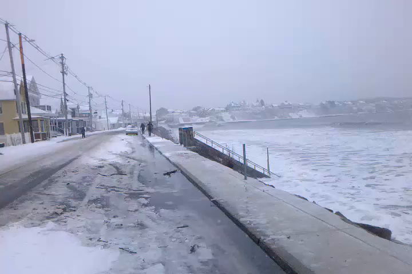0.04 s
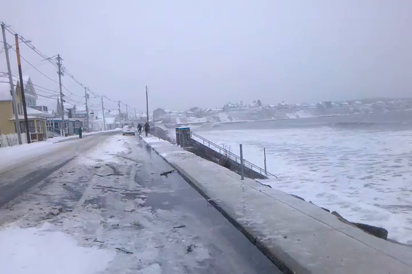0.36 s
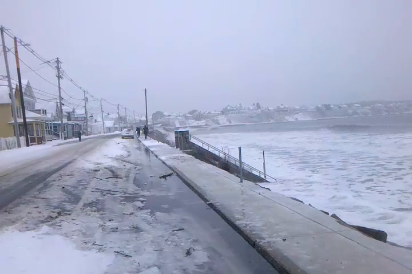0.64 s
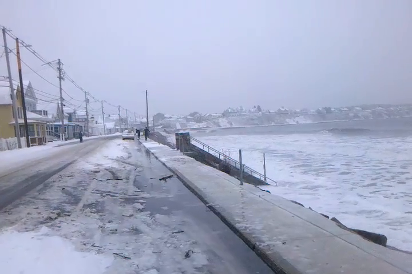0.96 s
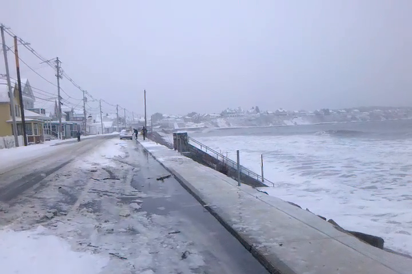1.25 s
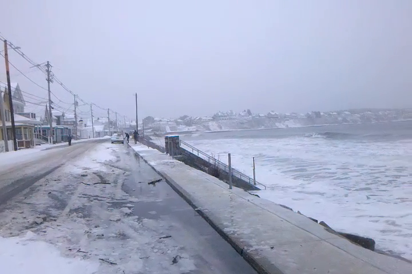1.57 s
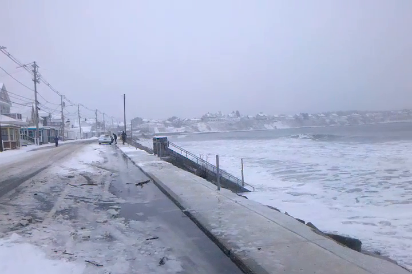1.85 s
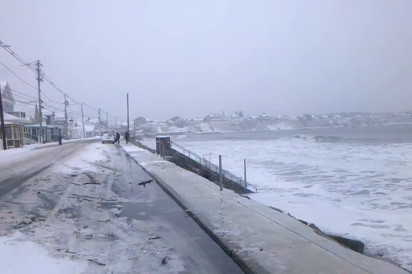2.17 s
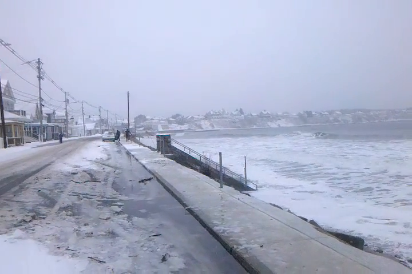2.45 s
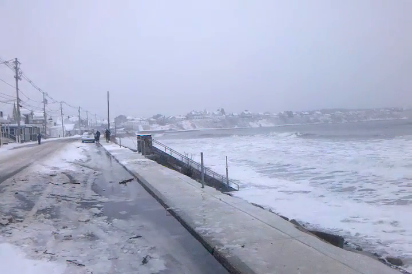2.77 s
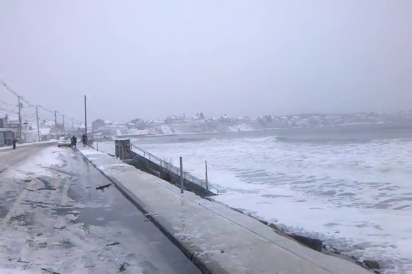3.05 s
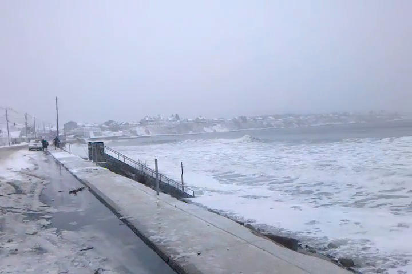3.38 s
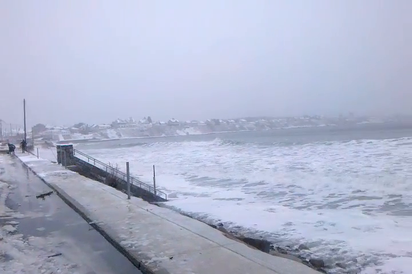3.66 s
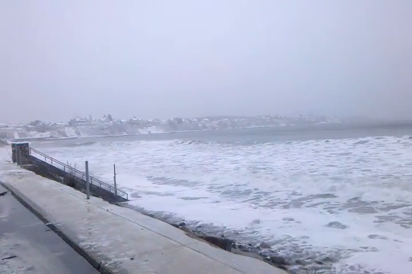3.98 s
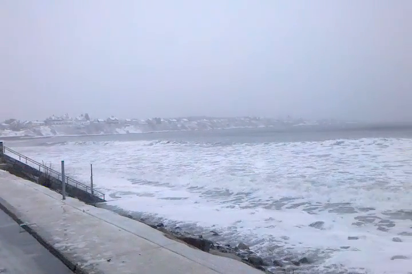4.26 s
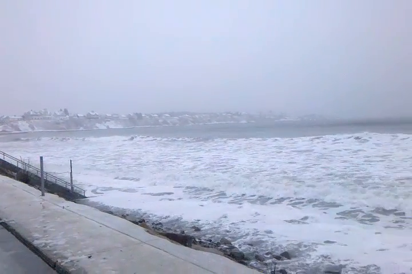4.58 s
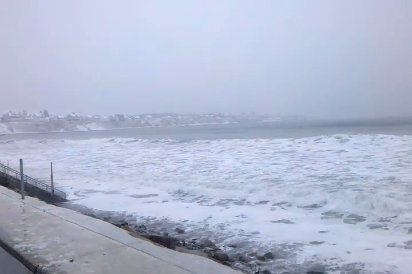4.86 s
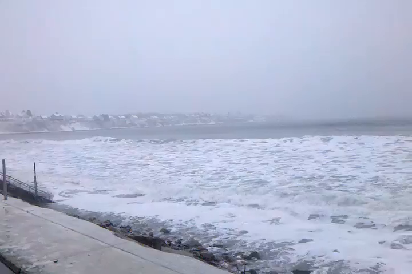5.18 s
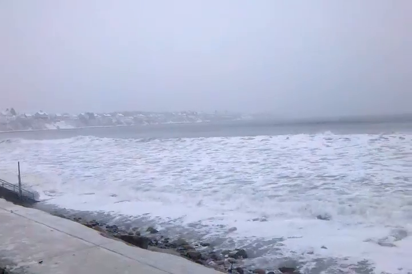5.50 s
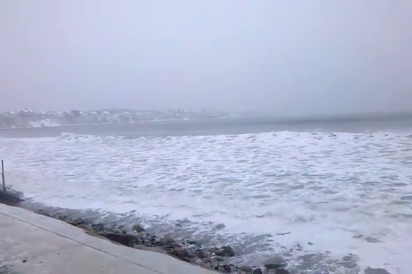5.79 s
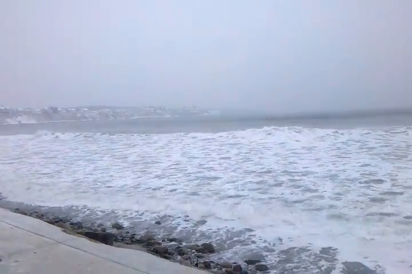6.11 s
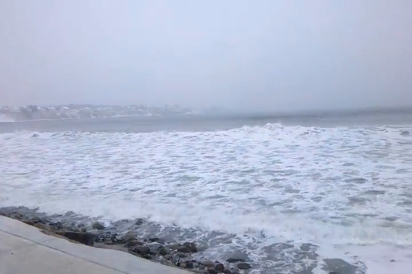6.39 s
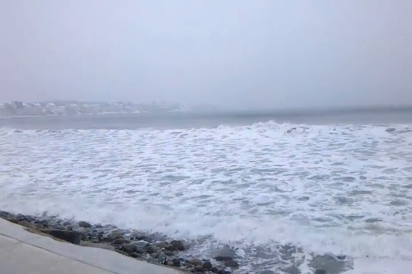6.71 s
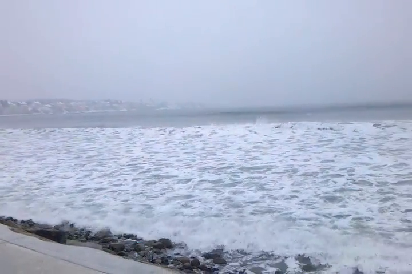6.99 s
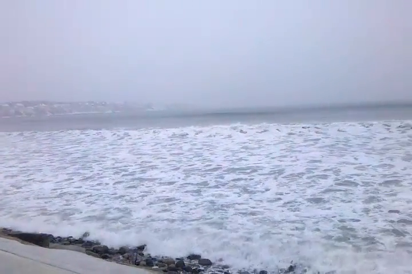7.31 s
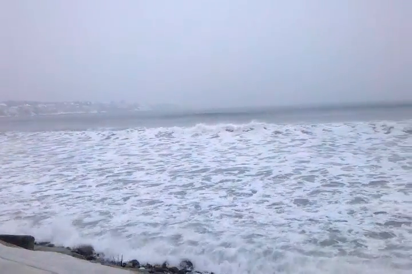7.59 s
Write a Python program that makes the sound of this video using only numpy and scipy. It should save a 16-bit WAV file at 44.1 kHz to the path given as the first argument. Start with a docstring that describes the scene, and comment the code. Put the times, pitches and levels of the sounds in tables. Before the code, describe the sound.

A rough sea comes in after a brief silence and roars continuously, with gentle swells of low rumble and hissing foam on the stones below a sea wall. A lumpy gust hits the microphone early and dies away. One sharp tick follows from a tap on the microphone. As it turns toward the water, the wash comes slightly forward, and cobbles clack several times in the final surge.

```python
"""Storm surf on a rocky shore, from a microphone on the sea wall. After a short silence the sea
fades in: breakers rumble farther out, white water roars, and foam washes over the stones below.
Wind buffets the microphone for the first seconds, and a tiny tap on it gives one sharp tick.
The microphone turns slowly from along the shore to face the water, trading roar for foam.
At the end a wave runs in and knocks the cobbles together."""
import sys
import numpy as np
from scipy import signal
from scipy.fft import rfft, irfft, next_fast_len
from scipy.io import wavfile
from scipy.ndimage import uniform_filter1d

SR = 44100
rng = np.random.default_rng(int(sys.argv[2]) if len(sys.argv) > 2 else 0)


def dump(signal):
    """Clip the signal to [-1, 1] and save it as 16-bit WAV at the path in sys.argv[1]."""
    limited = np.clip(np.atleast_2d(signal).T, -1, 1)
    pcm = np.round(limited * 32767).astype(np.int16)
    wavfile.write(sys.argv[1], SR, pcm)


N = 346185
TIME = np.arange(N) / SR


def breakers():
    """Farther out, big clouds of trapped air throb under the surf, and the white water above roars."""
    # Waves breaking. Each row: peak time in seconds, swell of the rumble in dB, half length in seconds.
    waves = [(1.522, 2.5, 0.19), (2.95, 2.5, 0.4), (4.25, 2.5, 0.38), (4.85, 2, 0.28), (6.15, 0.7, 0.39),
             (7.45, 1.5, 0.73)]
    # Spectrum of the rumble. Each row: frequency in Hz, relative level in dB.
    rumble_colour = [(25, -46), (45, -33.5), (70, -23), (100, -11), (130, -3.5), (190, 1), (270, -1.5),
                     (350, -3.5), (420, -10)]
    swell_db = swells(*np.transpose(waves))
    rumble = from_db(-40 + swell_db) * rms_one(noise(rumble_colour, 20, 394))
    roar_db = -42 + 0.65 * swell_db - 2.0 * facing()   # the microphone turns away from the roar up the bay
    roar = from_db(roar_db) * churn(388, 979, patchy_db=0.5, rate=6.3, bands=3)
    return rumble + roar


def foam():
    """Just below the wall, each surge washes and splashes over the stones, and its spray hisses."""
    # Each row: peak time in seconds, half length in seconds, wash swell in dB, spray swell in dB.
    surges = [(1.603, 0.29, 2, 4.0), (2.986, 0.16, 1.4, 3), (4.746, 0.65, 2, 2), (6.45, 0.4, 1.0, 1),
              (7.5, 0.57, 4.5, 2)]
    times, halves, wash_swells_db, spray_swells_db = np.transpose(surges)
    wash_db = -47 + swells(times, wash_swells_db, halves) + 1.85 * facing()
    spray_db = -49.5 + swells(times, spray_swells_db, halves) + 1.03 * facing()
    wash = from_db(wash_db) * churn(1007, 3065, patchy_db=0.5, rate=18, bands=4)
    spray = from_db(spray_db) * churn(3030, 10700, patchy_db=0.46, rate=9, bands=3)
    splashes = bubbles(per_s=1500, spread_db=7.5, cycles=7.2, low_hz=800, high_hz=5430, pitches=16)
    return wash + spray + from_db(wash_db - 10.5) * splashes


def churn(low_hz, high_hz, patchy_db, rate, bands):
    """Water noise in a few bands, each swelling by itself as patches of foam break; rms 1."""
    # Spectrum of the sea from the wall. Each row: frequency in Hz, relative level in dB.
    sea_colour = [(300, -3.5), (400, -6.5), (600, -5.5), (850, -8.5), (1100, -10.5), (1550, -13.5),
                  (1900, -13.5), (2500, -17.5), (3200, -17.5), (4300, -21), (5000, -21.5), (5800, -22),
                  (6700, -23.5), (7400, -27.5)]
    edges = np.geomspace(low_hz, high_hz, bands + 1)
    return rms_one(sum(noise(sea_colour, low, high) * from_db(patchy_db * drift(rate))
                       for low, high in zip(edges, edges[1:])))


def bubbles(per_s, spread_db, cycles, low_hz, high_hz, pitches):
    """Bubbles and drops of random size, each ringing down by 60 dB in a few cycles; rms 1."""
    sizes = from_db(spread_db * np.minimum(rng.exponential(1, N), 4)) * rng.choice([-1, 1], N)
    clicks = sizes * (rng.random(N) < per_s / SR)
    pitch_index = rng.integers(0, pitches, N)
    out = np.zeros(N)
    for k, hz in enumerate(np.geomspace(low_hz, high_hz, pitches)):
        angle = 2 * np.pi * hz / SR
        decay = np.exp(-np.log(1000) * hz / (cycles * SR))
        kicks = clicks * (pitch_index == k) + 1e-18
        out += signal.lfilter([0, np.sin(angle)], [1, -2 * decay * np.cos(angle), decay * decay], kicks)
    return rms_one(out)


def wind():
    """Turbulence right on the microphone: one lumpy gust dies to a breeze, and eddies hit briefly."""
    # Spectrum of the wind noise. Each row: frequency in Hz, relative level in dB.
    wind_colour = [(25, -33.5), (45, -22), (70, -12.5), (100, -2), (140, 3), (200, -1), (300, -7.5),
                   (450, -19), (900, -40.5)]
    # Eddies striking. Each row: peak time in seconds, level in dB, half length in seconds.
    buffets = [(1.21, -29, 0.025), (1.319, -27.5, 0.03), (1.384, -30.5, 0.017), (1.499, -27.5, 0.015),
               (1.545, -32, 0.0059), (1.733, -35, 0.038), (2, -28, 0.009), (2.026, -31, 0.01),
               (2.119, -30.5, .011), (2.152, -30, 0.0073), (2.248, -34, 0.008), (4.09, -45, 0.06),
               (5.99, -44, 0.063)]
    gust_db, breeze_db, lumps_db = -39.5, -60, 1.8
    peak_s, attack_s, hold_s, release_s = 1.01, 0.46, 0.42, 0.71
    early = np.maximum(peak_s - TIME, 0) / attack_s
    late = np.maximum(TIME - peak_s - hold_s, 0) / release_s
    push = np.hypot(from_db(breeze_db), from_db(gust_db) * np.exp(-early ** 2 - late ** 2))
    power = (push * from_db(lumps_db * drift(rate=25))) ** 2
    for at_s, level_db, half_s in buffets:
        power += from_db(level_db) ** 2 * np.exp(-((TIME - at_s) / half_s) ** 2)
    eddies = rms_one(noise(wind_colour, 20, 1200))
    # even out the noise, so that the flow, not chance, sets how hard each eddy hits
    local_power = uniform_filter1d(uniform_filter1d(eddies ** 2, size=700), size=500)
    return np.sqrt(power) * rms_one(eddies / np.sqrt(local_power + 0.05))


def stones(ring_s):
    """In the wash, a wave rolls cobbles together; each knock is a short, damped ring."""
    # Each row: start in seconds, peak level in dB, ring frequency in Hz.
    knocks = [(6.241, -32, 800), (6.724, -34, 1250), (7.184, -28.5, 1000), (7.509, -29, 1110),
              (7.558, -32, 1240), (7.677, -32, 1410), (7.741, -34, 970)]
    out = np.zeros(N)
    for start_s, level_db, hz in knocks:
        age = np.maximum(TIME - start_s, 0)
        out += from_db(level_db - 60 * np.minimum(age / ring_s, 3)) * np.sin(2 * np.pi * hz * age)
    return out


def tick(at_s, level_db, dull_hz, bass_hz):
    """One tiny tap on the microphone: a pressure spike that swings back once."""
    click = np.zeros(N)
    click[round(at_s * SR)] = 1
    spike = signal.lfilter(*signal.butter(1, dull_hz, fs=SR), click)
    spike = signal.lfilter(*signal.butter(2, bass_hz, "high", fs=SR), spike)
    return from_db(level_db) * spike / spike.max()


def facing(middle_s=4.7, takes_s=4.3):
    """How far the microphone has turned: 0 along the shore, 1 toward the water."""
    return 0.5 + 0.5 * np.sin(np.pi * np.clip((TIME - middle_s) / takes_s, -0.5, 0.5))


def swells(times, sizes_db, halves):
    """Each wave lifts the level in a smooth hump; dB over time."""
    return sum(size_db * np.exp(-((TIME - peak_s) / half_s) ** 2)
               for peak_s, size_db, half_s in zip(times, sizes_db, halves))


def noise(colour, low_hz, high_hz):
    """Noise of a given colour between two soft band edges."""
    size = next_fast_len(N, True)
    freqs = np.maximum(np.fft.rfftfreq(size, 1 / SR), 1)
    hz, level_db = np.transpose(colour)
    gain = from_db(np.interp(np.log(freqs), np.log(hz), level_db))
    edges = np.sqrt((1 + (low_hz / freqs) ** 16) * (1 + (freqs / high_hz) ** 16))
    return irfft(rfft(rng.standard_normal(size)) * gain / edges, size)[:N]


def drift(rate):
    """Smooth random wandering at about `rate` turns a second; spread 1."""
    hop, settle = 40, 2000   # samples a step, steps to settle
    pole = np.exp(-2 * np.pi * rate * hop / SR)
    steps = rng.standard_normal(N // hop + settle + 2)
    slow = signal.lfilter([1], [1, -2 * pole, pole * pole], steps)[settle:]
    return np.interp(np.arange(N) / hop, np.arange(len(slow)), rms_one(slow))


def from_db(db):
    """Decibels to gain."""
    return 10 ** (np.asarray(db) / 20)


def rms_one(x):
    """Scale to unit power."""
    return x / np.sqrt(np.mean(x ** 2) + 1e-20)


def scene():
    """Sea, stones, wind and tick at one microphone on the wall."""
    tap = tick(at_s=3.3252, level_db=-12.2, dull_hz=560, bass_hz=70)
    return (breakers() + foam() + stones(ring_s=0.032) + wind() + tap)[None]


def record(dry):
    """The sound fades in from silence; the microphone loses the deepest bass, and the top is cut."""
    start_s, fade_s, bass_hz, top_hz = 0.776, 0.25, 52, 6950
    fade = np.interp(TIME, [start_s, start_s + fade_s], [from_db(-15.5), 1], left=0)
    thin = signal.sosfilt(signal.butter(4, bass_hz, "high", fs=SR, output="sos"), dry * fade)
    return signal.sosfilt(signal.cheby1(9, 0.3, top_hz, fs=SR, output="sos"), thin)


dry = scene()
out = record(dry)
dump(out)
```